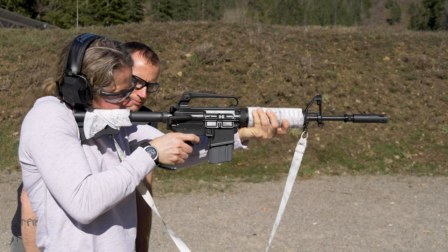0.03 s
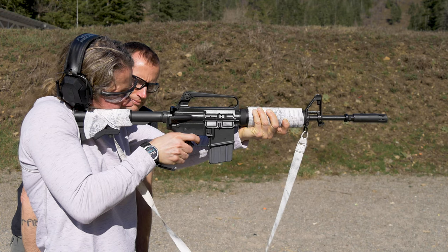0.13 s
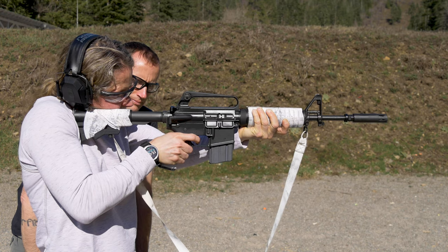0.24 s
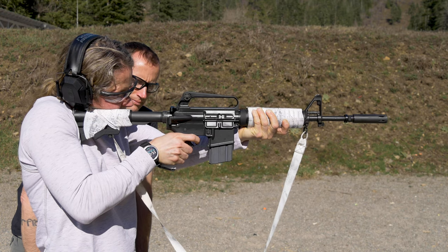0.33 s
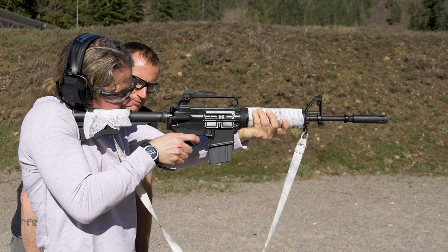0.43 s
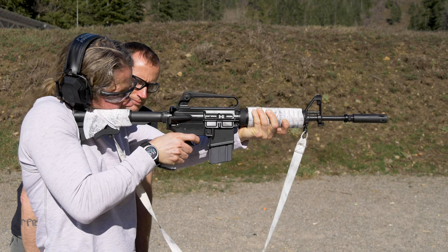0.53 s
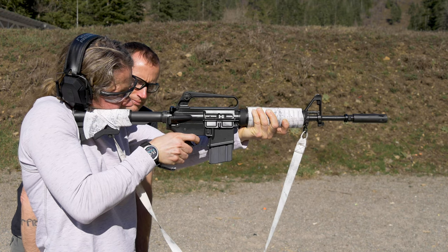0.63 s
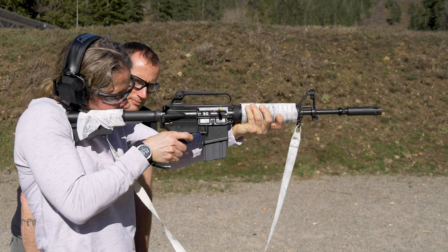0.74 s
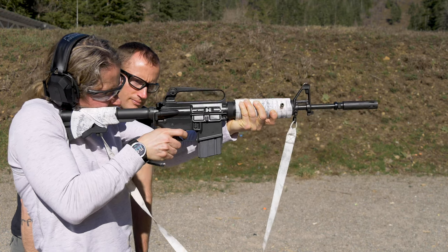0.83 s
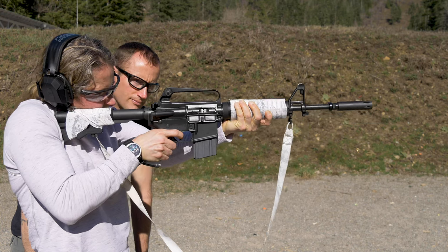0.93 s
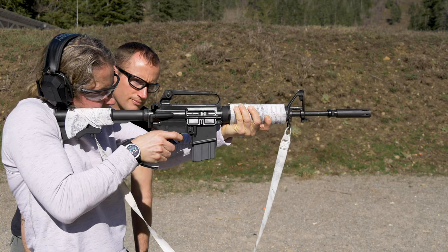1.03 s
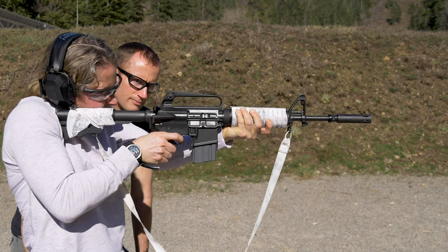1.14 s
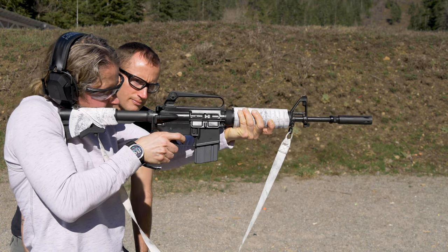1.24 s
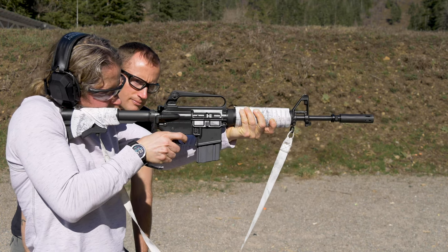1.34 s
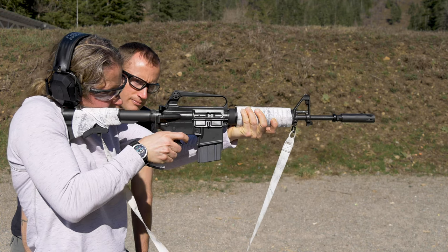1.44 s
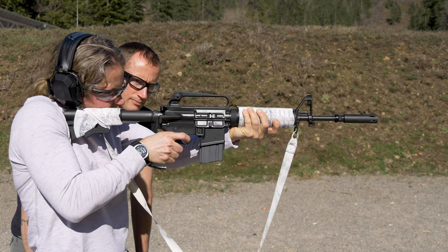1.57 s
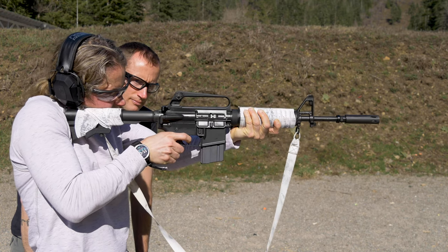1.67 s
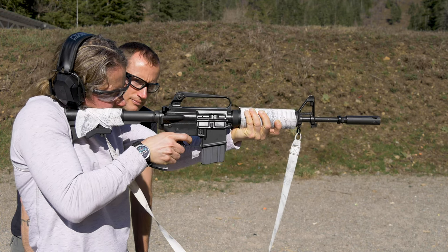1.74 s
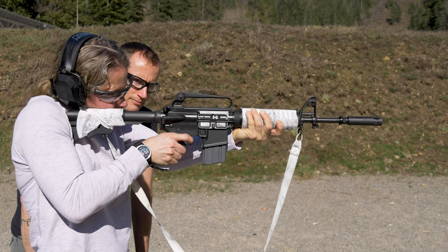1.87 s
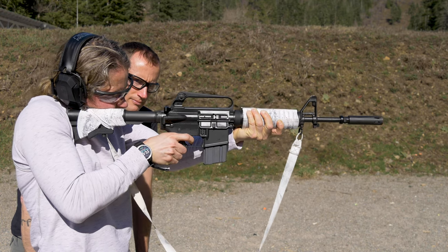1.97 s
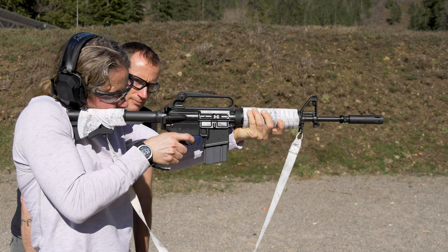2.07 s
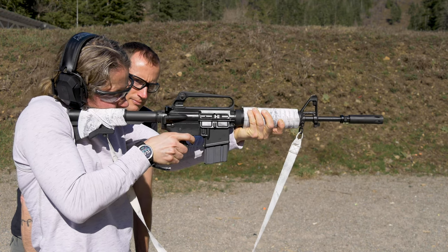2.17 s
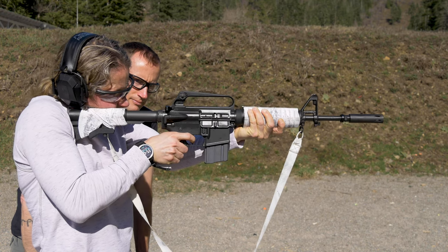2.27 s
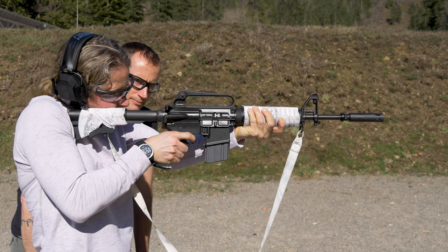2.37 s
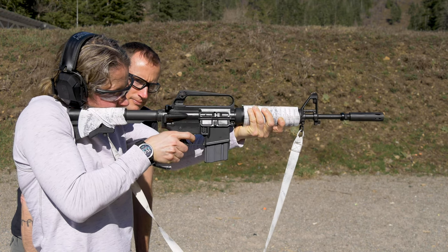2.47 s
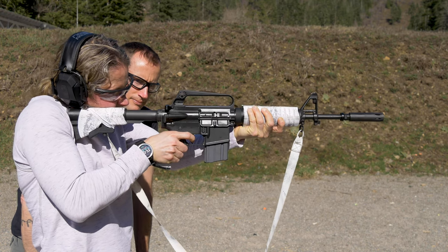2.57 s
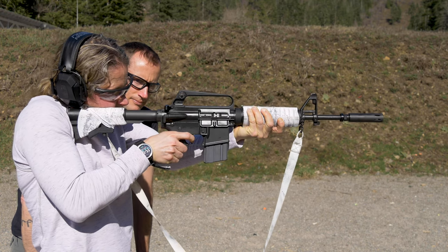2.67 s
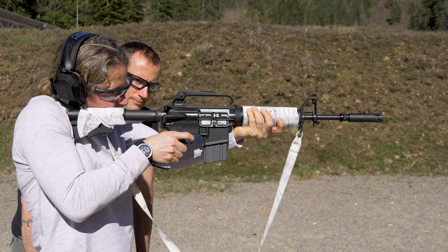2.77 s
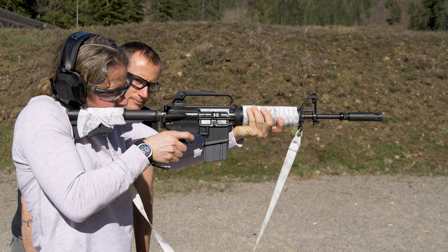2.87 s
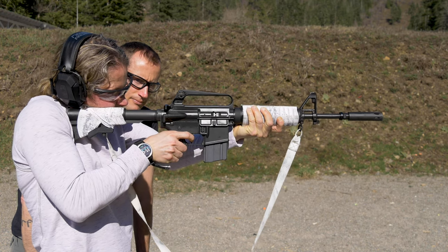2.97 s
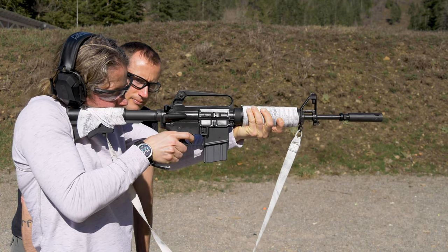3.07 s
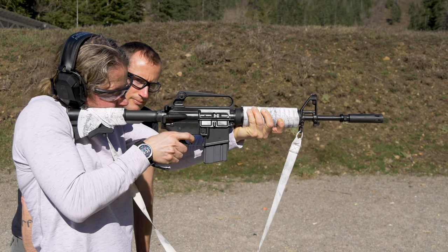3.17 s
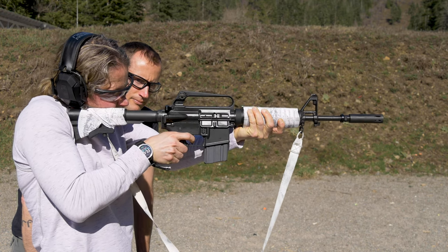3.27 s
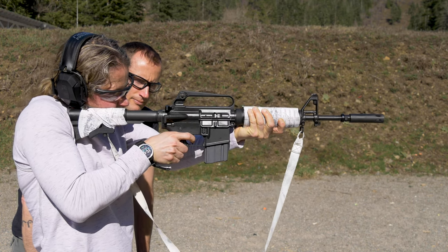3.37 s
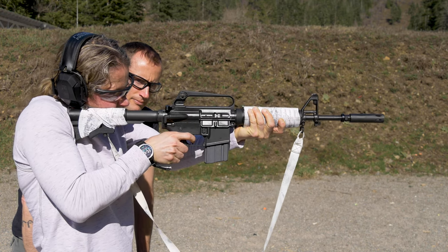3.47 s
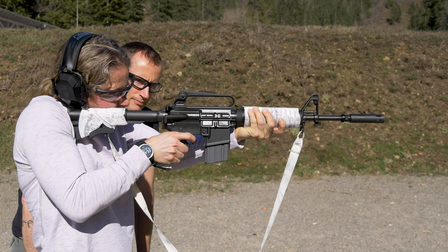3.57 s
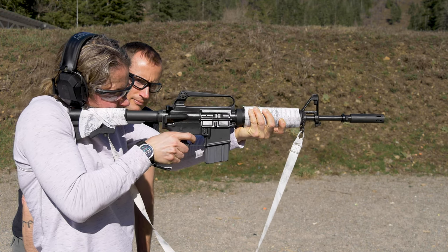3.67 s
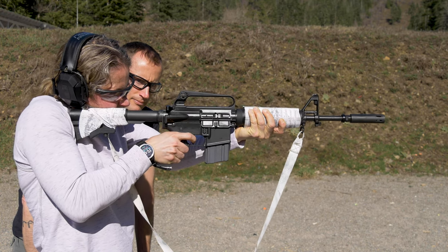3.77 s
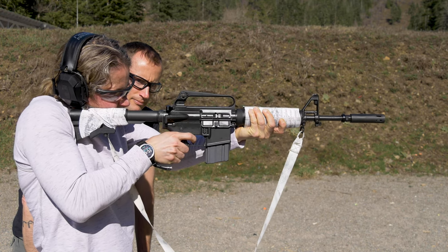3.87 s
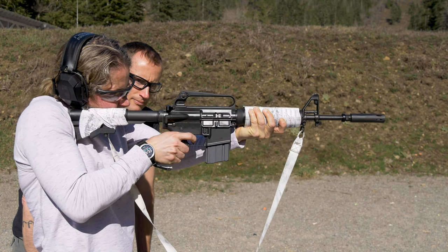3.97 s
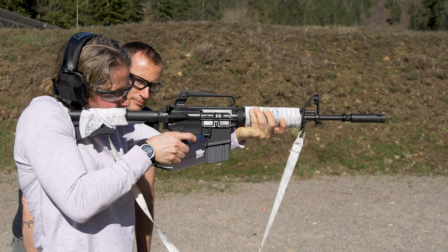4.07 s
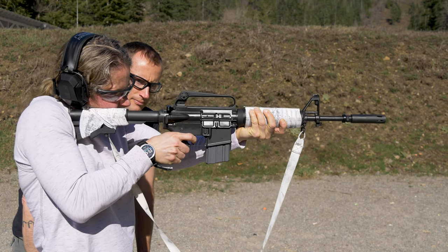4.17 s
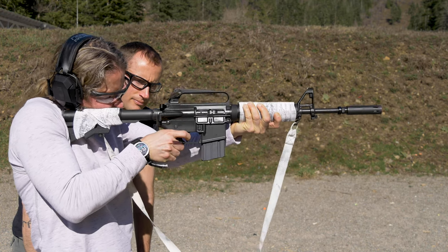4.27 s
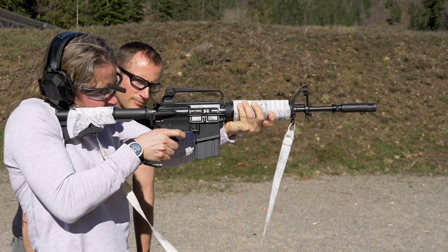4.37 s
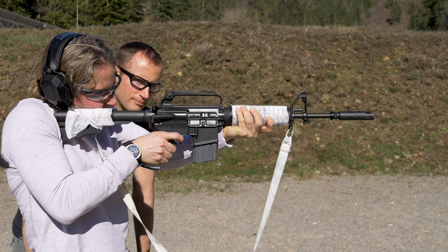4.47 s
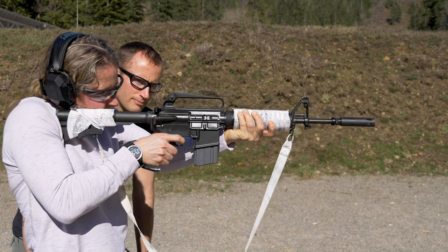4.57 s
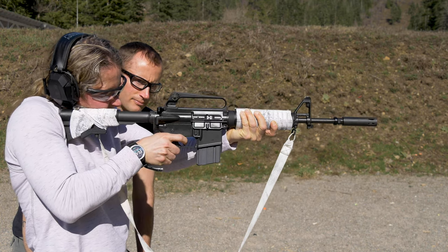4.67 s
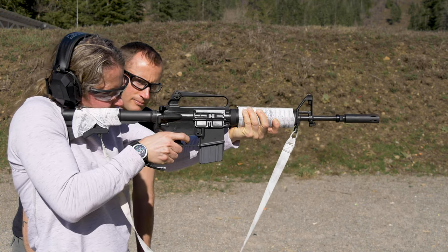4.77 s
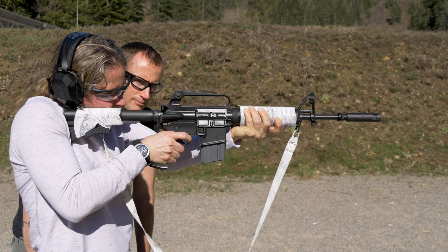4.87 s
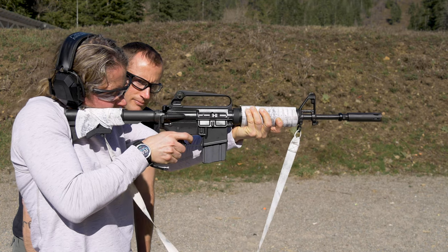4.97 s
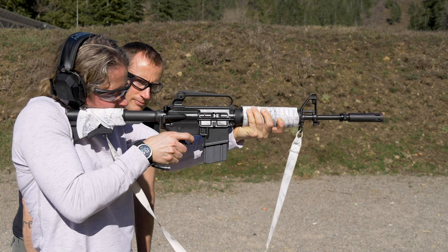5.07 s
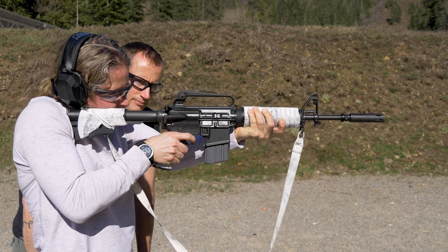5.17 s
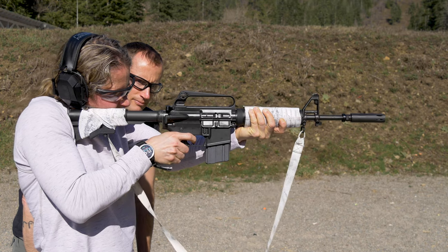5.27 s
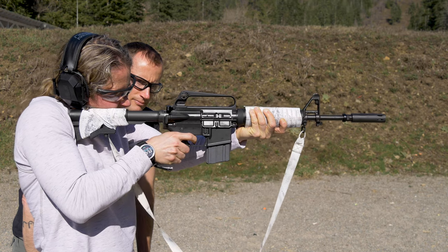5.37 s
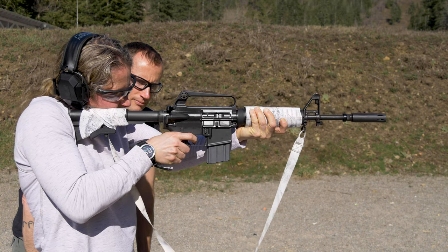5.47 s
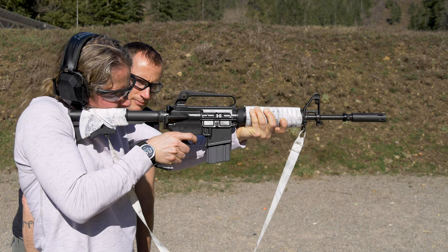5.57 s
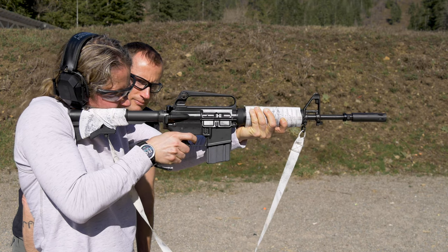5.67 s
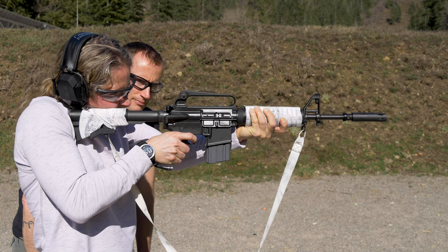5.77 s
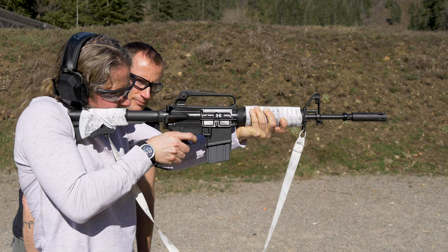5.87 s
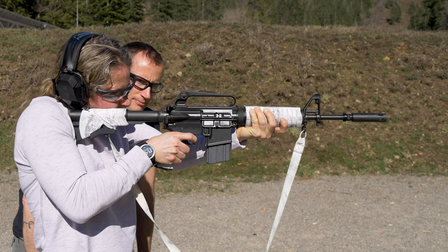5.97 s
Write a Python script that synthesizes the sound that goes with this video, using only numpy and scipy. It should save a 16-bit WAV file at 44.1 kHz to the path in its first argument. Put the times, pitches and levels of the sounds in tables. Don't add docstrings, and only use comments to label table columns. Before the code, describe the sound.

Two deliberate rifle shots about three and a half seconds apart, recorded so near that the microphone flattens. Each bursts with a hard crack and low thump, metallic action clack, and echoes from earth banks and trees. Between them come a small brass ring on stones, a wind puff, a muffled distant shot and tiny grit ticks over a faint motor.

```python
import sys
import numpy as np
from scipy import signal
from scipy.fft import rfft, irfft
from scipy.io import wavfile
from scipy.ndimage import map_coordinates

SR = 44100
rng = np.random.default_rng(int(sys.argv[2]) if len(sys.argv) > 2 else 0)


def pcm_store(signal):
    levels = np.round(np.clip(np.atleast_2d(signal), -1, 1) * 32767)
    wavfile.write(sys.argv[1], SR, levels.astype(np.int16).T)


def makeup_ratio(level_db):
    decades = np.asarray(level_db, float) / 20
    return 10 ** decades


N = 265041
T = np.arange(N) / SR


def unit(x):
    return x / np.sqrt(np.mean(x ** 2) + 1e-20)


def noise():
    return rng.standard_normal(N)


def along(points, hz):
    f, v = np.transpose(points)
    return np.interp(np.log(hz + 1), np.log(f + 1), v)


def curves(rows):
    s, *cols = np.transpose(rows)
    return [np.interp(T, s, c) for c in cols]


def wobble(rate):
    return map_coordinates(rng.standard_normal(int(N * rate / SR) + 4), [T * rate])


def coloured(x, spectrum):
    size = 1 << 12
    log_gain = np.log(makeup_ratio(along(spectrum, np.fft.rfftfreq(size, 1 / SR))) + 1e-6)
    cepstrum = irfft(log_gain)
    cepstrum[1:size // 2] *= 2
    cepstrum[size // 2 + 1:] = 0
    pulse = irfft(np.exp(rfft(cepstrum)))
    return signal.oaconvolve(x, pulse / np.linalg.norm(pulse))[:len(x)]


def travelled(x, age, loss_db):
    hz, t, z = signal.stft(x, SR, nperseg=128)
    loss = loss_db * (hz[:, None] / 4000) ** 1.4 * np.interp(t, T, age)
    return signal.istft(z * makeup_ratio(-loss), SR, nperseg=128)[1][:N]


def delayed(x, s):
    return np.pad(x, (round(s * SR), N))[:N]


def ring(modes, attack, count=SR // 4):
    t = T[:count]
    out = np.zeros(count)
    for hz, db, t60 in modes:
        out += makeup_ratio(db + rng.normal(0, .7) - 60 * t / t60) * np.sin(2 * np.pi * hz * t)
    return out * (1 - np.exp(-t / attack))


# frequency in Hz, level in dB per Hz.
HUSH = [(18, -43.5), (30, -10), (59, -6), (112, 2), (210, -10), (600, -4), (1220, -14.5), (2290, -24),
        (11700, -45.5), (16000, -68)]
# centre in seconds, level in dB, half length in seconds.
GUSTS = [
    (0, -49.5, 0.28),
    (1.15, -54, .2),
    (1.78, -41.5, .12),
    (2.35, -56, .25),
    (3.3, -65, .4),
    (4.7, -66, .15),
]
CALM_DB = -76


def air():
    gust = coloured(noise(), [(10, -7.5), (30, -2.5), (60, -6), (120, -16), (400, -50.5), (900, -91)])
    blow = makeup_ratio(CALM_DB) + sum(makeup_ratio(db) * np.exp(-((T - s) / half) ** 2) for s, db, half in GUSTS)
    return blow * makeup_ratio(3 * wobble(9)) * gust + makeup_ratio(-60.5) * coloured(noise(), HUSH)


# time in seconds, shaft speed in turns a second, load (overtones) in dB.
ENGINE = [
    (0, 41.8, -49),
    (.75, 45.3, -45),
    (1.6, 44, -56),
    (2.6, 41, -60),
    (4.2, 36, -70),
    (5, 33, -64),
    (6.01, 32.6, -56),
]
# multiple of the shaft speed, level in dB.
ORDER = [(1, -1), (2, -16), (4, -19.5), (5, -4), (6, -15), (8, 2.5), (9, -3), (10, -5.5), (11, -8),
         (12, -1), (13, -9), (17, -5.5), (19, -12.5), (25, -10.5)]
# frequency in Hz, level in dB per Hz.
ROAR = [(35, -24.5), (60, -3), (86, -10.5), (217, -14), (271, -14.5), (338, -1), (482, -4.5), (629, -11),
        (839, -9.5), (1430, -13.5), (1630, -16.5), (12000, -54.5), (15600, -90), (22000, -120)]
FIRING_DB, FIRING_FOLLOWS = -60, .15


def engine():
    speed, overtones_db = curves(ENGINE)
    firing_db = FIRING_DB + FIRING_FOLLOWS * (overtones_db - overtones_db.mean())
    turn = 2 * np.pi * np.cumsum(speed) / SR
    stack = np.zeros(N)
    for k, db in ORDER:
        phase = k * turn + 0.073 * k * wobble(6.7) + rng.uniform(0, 6)
        stack += makeup_ratio(db + 2.5 * wobble(22)) * np.sin(phase)
    roar = coloured(noise(), ROAR) * makeup_ratio(-6.5 + 1.5 * np.sin(turn))
    firing = makeup_ratio(firing_db + 0.5 + 1.5 * wobble(7.2)) * np.sin(3 * turn + 0.4 * wobble(8.0))
    return makeup_ratio(overtones_db) * (stack / 3 + roar) + firing


# first trees and build-up in s, level in dB, loss in dB a second,
# spreading in dB for a tenfold path.
WOODS_BOOM = (0.1875, 0.04, -10.5, 14.5, 21)
WOODS_CRACK = (0.23, .04, -16, 44, 12)
WOODS_FAR = (0.0167, 0.11, -28, 10, 11)
SPREAD_S = .3


def woods(age, first, builds, db, loss_db, spread_db):
    late = np.clip(age - first, 0, None)
    level_db = db - loss_db * late - spread_db * np.log10(1 + late / SPREAD_S)
    return makeup_ratio(level_db) * (1 - np.exp(-late / builds))


# start in seconds, frequency in Hz, level in dB, t60 in seconds, sign of the first swing.
FAR_GUN = [
    (1.9429, 490, -14.5, .022, -1),
    (1.9455, 100, -19, .07, 1),
    (1.9518, 300, -21, .02, -1),
]
# start in seconds, level in dB, thump level in dB.
FAR_SLAPS = [
    (1.945, -35.5, -35.5),
    (1.974, -36, -32.5),
    (1.988, -33, -37.5),
    (2.02, -50, -37),
    (2.048, -33, -35.5),
    (2.06, -40, -43),
    (2.12, -41, -46.5),
]
# frequency in Hz, level in dB per Hz.
FAR_TONE = [(30, -32.5), (90, -17), (190, -13), (270, -2.5), (690, -0.5), (1100, -3), (1700, -7.5),
            (2600, -13.5), (3500, -22), (6000, -30), (10000, -33), (13000, -46), (18000, -89.5)]


def far_gun():
    thud = sum(sign * delayed(ring([(hz, db, t60)], .0004), s) for s, hz, db, t60, sign in FAR_GUN)
    age = np.clip(T - FAR_GUN[0][0], 0, None)
    slap_env = woods(age, *WOODS_FAR) * makeup_ratio(0.9 * wobble(60))
    thump_env = np.zeros(N)
    for s, db, thump_db in FAR_SLAPS:
        slap_env += delayed(makeup_ratio(db - 60 * T[:SR] / 0.028), s)
        thump_env += delayed(makeup_ratio(thump_db - 60 * T[:SR] / .15), s)
    low = [(20, -27), (70, -0.5), (150, -3.5), (500, -16.5), (1500, -49), (9000, -110)]
    rumble = coloured(thump_env * noise(), low)
    return thud + rumble + travelled(coloured(slap_env * noise(), FAR_TONE), age, 16)


# start in seconds, level in dB, centre in Hz.
TICKS = [
    (2.0465, -41, 3600),
    (2.378, -64, 13000),
    (3.2025, -69, 10000),
    (3.3033, -63, 9000),
    (3.7099, -68, 10020),
    (5.047, -59, 10000),
    (5.5873, -66, 11000),
    (5.9819, -69.5, 10000),
]
# seconds after the shot, level in dB, centre in Hz.
EJECT = [
    (.1117, -29, 8495),
    (.165, -32, 14410),
    (.1655, -28, 5000),
]
# landing in seconds, tick level in dB, hop in seconds, brass ring in dB.
LANDINGS = [
    (1.474, -40, .1, -38),
    (5.035, -51, .03, -90),
]
# time after landing in hops, level in dB relative to the landing.
SKIPS = [
    (-.02, -4),
    (1, -22),
    (1.12, -25),
]
# frequency in Hz, level in dB, t60 in seconds.
BRASS = [(10700, -3, .12), (10950, 3, .02), (15060, -10, .14), (15270, -11, .11)]
HAMMER_S, HAMMER_DB = .0068, -13
TICK_T60 = .012


def ticks():
    contacts = list(TICKS)
    for shot, *_ in SHOTS:
        contacts.append((shot - HAMMER_S, HAMMER_DB, 5000))
        contacts += [(shot + after, db, hz) for after, db, hz in EJECT]
    for s, db, hop, _ in LANDINGS:
        contacts += [(s + hops * hop, db + under, 9800) for hops, under in [(0, 0)] + list(SKIPS)]
    out, t = np.zeros(N), T[:SR // 20]
    for s, db, hz in contacts:
        band = [(hz / 4, -36), (hz / 1.5, -9), (hz, 0), (hz * 1.4, -9), (hz * 3, -26), (hz * 5, -60)]
        burst = makeup_ratio(db - 60 * t / TICK_T60) * rng.standard_normal(len(t))
        out += delayed(coloured(burst, band), s)
    return out + sum(makeup_ratio(ring_db) * delayed(ring(BRASS, .0006), s) for s, *_, ring_db in LANDINGS)


# begin and end in seconds after the shot, strength in dB,
# leafiness in dB (more crack, less thump).
SURFACES = [
    (0, .003, 0, 4),
    (.006, .062, 4.5, -2),
    (.056, 0.072, 4.5, -5),
    (.07, 0.082, -6, -11),
    (.085, .136, -16.5, -0.5),
    (.125, 0.173, -22.5, 2),
    (.176, .205, -15, 1),
    (0.199, .24, -11, -5),
    (.267, .285, -22, 0),
]
RISE_SHARE = .15
THUMP_DB, CRACK_DB = -6, -6


def blast_envelopes():
    power = np.array([0 * T, woods(T, *WOODS_BOOM) ** 2, woods(T, *WOODS_CRACK) ** 2])
    t = T[:SR // 2]
    for start, end, db, leafy_db in SURFACES:
        rise = RISE_SHARE * (end - start)
        layer_db = [db + THUMP_DB - leafy_db, db, db + CRACK_DB + leafy_db]
        lit = 1 - np.exp(-np.clip(t - start, 0, None) / rise)
        lit *= np.exp(-np.clip(t - end, 0, None) / .004)
        power[:, :len(t)] += np.outer(makeup_ratio(layer_db), lit) ** 2
    return np.sqrt(power)


# delay in seconds, level in dB.
ECHOES = [
    (.0992, 4),
    (.1655, -8),
    (.167, -10),
    (.191, -11),
    (.2145, -1),
    (.218, -3),
    (.242, -5),
    (.268, -7),
    (.323, -17),
    (.379, -14),
]
# frequency in Hz, level in dB, t60 in seconds.
SLAP = [(620, 0, .025), (1500, -9, .008), (3000, -14, .004)]


def flat_echoes():
    return sum(-makeup_ratio(db) * delayed(ring(SLAP, .0001), delay) for delay, db in ECHOES)


def muzzle_pulse():
    u = np.clip(T - .0018, 0, None) / .0016
    return makeup_ratio(9.0) * (u > 0) * (1 - u) * np.exp(-u)


# start in seconds, blast level in dB, bolt slam in seconds after the shot.
SHOTS = [
    (0.8073, -2.5, 0.054),
    (4.3034, -3, 0.059),
]
# frequency in Hz, level in dB per Hz.
THUMP = [(15, -34), (50, -9), (120, -5), (200, -5), (330, 0), (500, -3), (900, -18), (2000, -50),
         (9000, -100)]
# frequency in Hz, level in dB per Hz.
BOOM = [(35, -51.5), (60, -26), (172, -17.5), (256, -14), (315, -5.5), (566, -3), (785, -12.5), (1110, -8),
        (1340, -15), (1580, -11.5), (1820, -14), (2650, -17), (13300, -43), (16000, -75.5)]
# frequency in Hz, level in dB per Hz.
CRACK = [(300, -41), (900, -9), (1900, 4), (3000, -12.5), (6000, -2), (11000, -5.5), (16000, -14),
         (21000, -36.5)]
# frequency in Hz, level in dB per Hz.
RUSTLE = [(600, -40.5), (1500, -6.5), (2600, -3), (5000, -6.5), (8000, -4.5), (11000, -4), (14000, -12.5),
          (16000, -18.5), (21000, -50)]
# frequency in Hz, level in dB, t60 in seconds.
BOLT = [(3750, -7, .035), (5430, 0, .035), (5720, -3, .03), (7600, -12, .02)]
LEAVES_S = .085


def rifle():
    thump_env, boom_env, crack_env = blast_envelopes()
    ground = coloured(thump_env * noise(), THUMP) + muzzle_pulse() + flat_echoes()
    trunks = unit(noise() * makeup_ratio(1.5 * wobble(70)))
    out = np.zeros(N)
    for s, db, slam in SHOTS:
        boom = coloured(boom_env * unit(trunks + .4 * noise()), BOOM)
        hiss = crack_env * noise()
        crack = coloured(hiss * (T < LEAVES_S), CRACK)
        rustle = travelled(coloured(hiss * (T >= LEAVES_S), RUSTLE), T, 20)
        out += delayed(makeup_ratio(db) * (ground + crack + rustle + travelled(boom, T, 24)), s)
        out += makeup_ratio(-53) * delayed(ring([(12758, 0, .9)], .003, count=SR), s + .07)
        out += makeup_ratio(3.5) * delayed(ring(BOLT, 0.0011), s + slam)
    return out


def scene():
    return (air() + engine() + far_gun() + ticks() + rifle())[None]


def low_pass(x):
    return signal.sosfilt(signal.butter(12, 16000, fs=SR, output="sos"), x)


def record(dry):
    low_cut = signal.butter(2, 27, "high", fs=SR, output="sos")
    dry = signal.sosfilt(low_cut, dry)
    flat = dry / (1 + np.abs(dry / .99) ** 10) ** (1 / 10)
    return low_pass(flat)


dry = scene()
out = record(dry)
pcm_store(out)
```